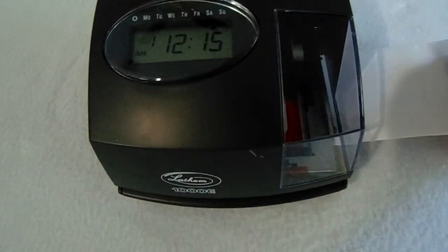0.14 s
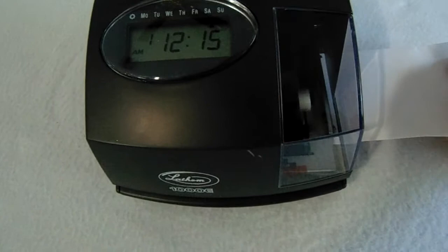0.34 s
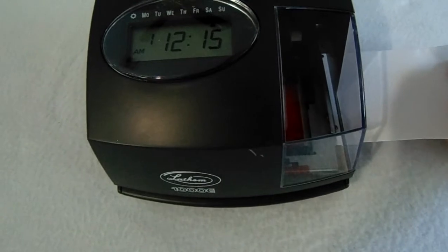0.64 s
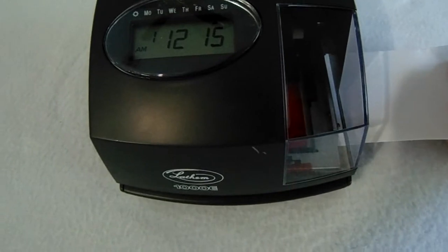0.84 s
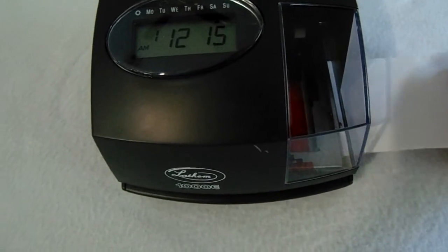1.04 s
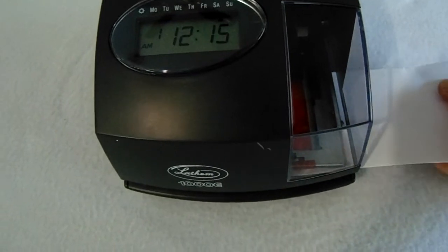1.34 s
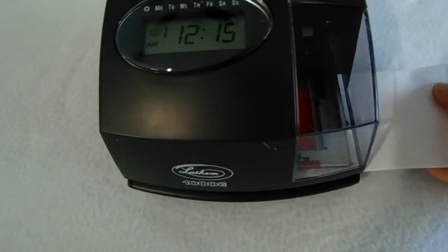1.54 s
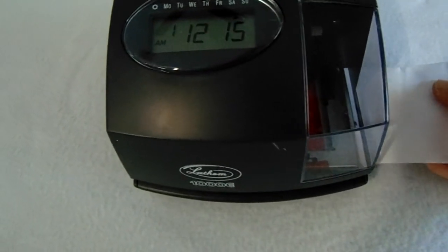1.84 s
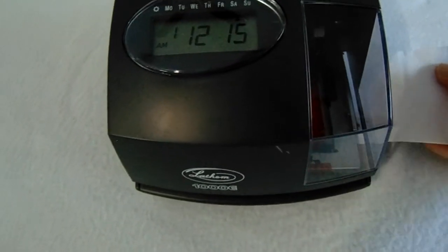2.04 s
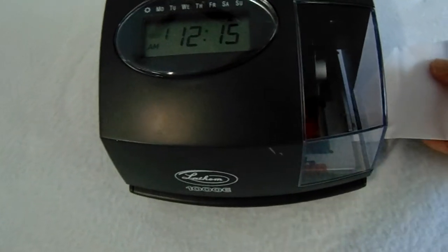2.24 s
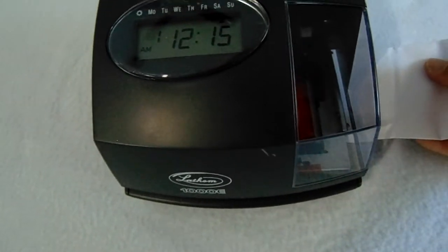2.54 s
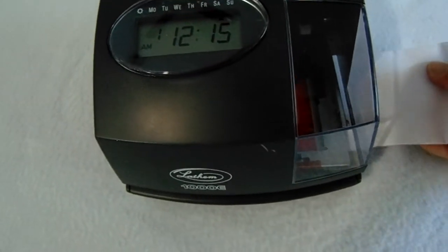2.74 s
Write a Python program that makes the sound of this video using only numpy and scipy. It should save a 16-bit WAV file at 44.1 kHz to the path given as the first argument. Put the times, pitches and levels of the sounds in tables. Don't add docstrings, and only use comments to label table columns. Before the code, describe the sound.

A desk time clock stamps a card twice with harsh motorized buzzing prints and sharp clacks

```python
import sys
import numpy as np
from scipy import signal
from scipy.fft import rfft, irfft, next_fast_len
from scipy.io import wavfile
from scipy.ndimage import uniform_filter1d, map_coordinates

SR = 44100
rng = np.random.default_rng(int(sys.argv[2]) if len(sys.argv) > 2 else 0)


def gain_from_db(level_db):
    decades = np.asarray(level_db, float) / 20
    return 10 ** decades


def dump(signal):
    limited = np.clip(np.atleast_2d(signal).T, -1, 1)
    pcm = np.round(limited * 32767).astype(np.int16)
    wavfile.write(sys.argv[1], SR, pcm)


N = 127890
TIME_S = np.arange(N) / SR
BEAT, BEAT_RATE_HZ, WANDER_HZ = 0.45, 62, 10
ROUGH_DB, ROUGH_RATE_HZ = 2.2, 180


def unit(x):
    return x / np.sqrt(np.mean(x ** 2) + 1e-20)


def along(points, hz):
    point_hz, value = np.transpose(points)
    return np.interp(np.log(hz + 1), np.log(point_hz + 1), value)


def curves(rows):
    s, *columns, level_db = np.transpose(rows)
    moving = [np.interp(TIME_S, s, column) for column in columns]
    return moving + [np.interp(TIME_S, s, level_db, -150, -150)]


def wobble(rate_hz):
    knots = rng.standard_normal(int(N * rate_hz / SR) + 4)
    return map_coordinates(knots, [np.arange(N) * rate_hz / SR])


def filtered(x, response):
    size = next_fast_len(N + SR // 2)
    return irfft(rfft(x, size) * response(np.fft.rfftfreq(size, 1 / SR)), size)[..., :N]


def noise(spectrum):
    return unit(filtered(rng.standard_normal(N), lambda hz: gain_from_db(along(spectrum, hz))))


def resonances(table):
    def response(f):
        total = 0
        for k, (hz, width, db) in enumerate(table):
            total = total + (-1) ** k * gain_from_db(db) * 1j * f * width / (hz * hz - f * f + 1j * f * width)
        return total
    return response


def phase(hz):
    return 2 * np.pi * np.cumsum(hz) / SR


def tone(hz, orders, beat):
    turn = phase(hz + WANDER_HZ * wobble(90))
    shaft = 2 * np.pi * BEAT_RATE_HZ * TIME_S
    out = 0
    for multiple, db in orders:
        swell = 1 + beat * np.sin(shaft + wobble(40) + 6 * rng.random())
        level = gain_from_db(db + ROUGH_DB * wobble(ROUGH_RATE_HZ))
        out = out + level * swell * np.sin(round(multiple) * turn + 6 * rng.random())
    return unit(out)


def effort(groups):
    power = 0
    for s, length, db in groups:
        after = np.clip(TIME_S - s - length, 0, None)
        rise = np.clip((TIME_S - s) / 0.00097, 0, 1) ** 2
        ring = gain_from_db(-120 * after / 0.045)
        rattle = gain_from_db(2 * -9 - 120 * after / 0.094)
        power = power + gain_from_db(2 * db) * rise * (ring + rattle)
    return np.sqrt(power)


# start_s, length_s, force_db
PRINT_GROUPS = [
    [(.284, 0.036, -16.5), (.327, 0.01, -20.5), (.343, 0.021, -19)],
    [(2.295, 0.043, -18), (2.343, 0.0046, -19.5), (2.356, 0.021, -20.5)],
]
# time_s, rate_hz, level_db
IN_STEP = [
    [(.284, 1089, -22.5), (.305, 1043, -28), (.325, 1007, -31), (.345, 1040, -34)],
    [(.312, 1135, -40), (.326, 1115, -28), (.337, 1092, -30), (.349, 1015, -28), (.368, 950, -33),
     (.38, 955, -46), (.39, 963, -38), (.418, 960, -40), (.428, 960, -55)],
    [(2.297, 1073, -37), (2.32, 1090, -26), (2.333, 1081, -21.5), (2.342, 1083, -26), (2.352, 1070, -35),
     (2.36, 1075, -18), (2.376, 1072, -25.5), (2.382, 1100, -39), (2.4, 1072, -55)],
]
# multiple of the rate, level_db
IN_STEP_ORDERS = [
    [(2, 8)],
    [(1, -9), (3, -1)],
    [(1, 1.5), (2, -4.5), (3, 4), (4, -8.5)],
]
# pitch_hz, width_hz, level_db
HEAD_RINGS = [(4620, 140, -7.5), (5700, 170, 3), (7360, 280, -4), (8780, 120, -6), (9170, 140, 2.5),
              (10300, 200, 3), (11130, 190, -7), (12740, 150, 1), (13000, 150, -0.5), (14000, 290, 5.5)]
# pitch_hz, level_db (per Hz)
PLATEN_COLOUR = [(120, -71), (200, -14), (737, -18), (1130, 1), (1380, -11.5), (2190, -10.5), (3300, -9.5),
                 (3950, -13.5), (14300, -10)]


def needles():
    column_hz, scatter_db, column_db, loose = 1070, 2.5, 1, 1.23
    head_db, platen_db, platen_lag_s = -3.5, -1.5, 0.0059
    shake_db, shake_hz = -39, 100
    push = sum(effort(groups) for groups in PRINT_GROUPS)
    fire = np.diff(np.floor(np.arange(N) * column_hz / SR), prepend=0)
    fire = unit(fire * gain_from_db(scatter_db * rng.standard_normal(N))) * np.sign(rng.standard_normal(N))
    blows = push * gain_from_db(column_db * wobble(200)) * unit(fire + loose * rng.standard_normal(N))

    ring, f = resonances(HEAD_RINGS), np.linspace(1, SR / 2, 2000)
    head = filtered(blows, ring) / np.sqrt(np.mean(abs(ring(f)) ** 2))
    late_push = uniform_filter1d(push, size=round(platen_lag_s * SR))
    late_push = np.roll(late_push, round(platen_lag_s * SR / 2))
    lag = np.minimum(1, late_push / (push + 1e-9))
    platen = filtered(lag * blows, lambda hz: gain_from_db(along(PLATEN_COLOUR, hz)))
    platen = platen / np.sqrt(np.mean(gain_from_db(2 * along(PLATEN_COLOUR, f))))

    in_step = 0
    for rows, orders in zip(IN_STEP, IN_STEP_ORDERS):
        rate_hz, level_db = curves(rows)
        in_step = in_step + gain_from_db(level_db) * tone(rate_hz, orders, BEAT)
    shake = uniform_filter1d(push, size=1500) * tone(shake_hz, [(1, 0)], BEAT / 2)
    return gain_from_db(head_db) * head + gain_from_db(platen_db) * platen + in_step + gain_from_db(shake_db) * shake


# time_s, pitch_hz (rate of meeting teeth), level_db
GEAR_WHINE = [
    [(.205, 1114, -67), (.24, 1191, -36), (.273, 1185, -32.5), (.34, 1170, -35.5), (.39, 1200, -48),
     (.468, 1150, -72), (.485, 1126, -35), (.53, 1190, -38.5), (.585, 1198, -35)],
    [(2.25, 1178, -39), (2.35, 1208, -32), (2.372, 1206, -38), (2.398, 1140, -31), (2.44, 1128, -36),
     (2.48, 1126, -71), (2.505, 1157, -33), (2.555, 1207, -42), (2.6, 1208, -36)],
]
# multiple of the pitch, level_db
WHINE_ORDERS = [(1, -5), (2, 3.5)]
# pitch_hz, level_db (per Hz)
GRIND_COLOUR = [(88, -23.5), (150, -27), (347, -6), (1030, -14), (1200, -1.5), (1320, -15.5), (2380, -11),
                (3420, -17.5), (14300, -33)]
# on_s, off_s, grind_db
MOTOR_RUNS = [
    (0.187, 0.6, -35),
    (2.217, 2.612, -35),
]
# start_s, length_s, pitch_hz, level_db
SQUEAK_BURSTS = [(.247, 0.012, 4720, -35), (0.267, 0.014, 4765, -26), (.4, .01, 4800, -43),
                 (.416, 0.0081, 4850, -42), (0.419, .045, 1001, -39), (0.452, 0.014, 3970, -41),
                 (.477, 0.014, 4790, -37), (0.496, 0.027, 4750, -37), (0.53, 0.055, 4730, -41),
                 (0.581, 0.017, 4760, -39), (2.23, .012, 2920, -44), (2.28, .014, 4870, -35),
                 (2.294, .01, 4150, -35), (2.306, 0.05, 4380, -35), (2.415, 0.034, 4530, -45),
                 (2.497, 0.024, 4700, -39), (0.283, 0.014, 11300, -26), (0.29, .026, 9160, -24),
                 (0.342, .03, 14000, -29), (.345, 0.02, 13000, -31), (2.296, 0.009, 9900, -22),
                 (2.295, 0.0082, 11050, -23), (2.301, .03, 5850, -31.5), (2.359, 0.027, 7060, -28)]


def motor():
    spin_up_s, coast_t60_s = 0.061, 0.2
    out = 0
    for rows, (on, off, grind_db) in zip(GEAR_WHINE, MOTOR_RUNS):
        hz, db = curves(rows)
        coast = gain_from_db(-60 * np.clip(TIME_S - off, 0, None) / coast_t60_s)
        run = np.clip((TIME_S - on) / spin_up_s, 0, 1) * coast
        out = out + gain_from_db(db) * tone(hz, WHINE_ORDERS, BEAT)
        out = out + gain_from_db(grind_db) * run * noise(GRIND_COLOUR)
    for s, length, hz, db in SQUEAK_BURSTS:
        turn = phase(hz + 3 * WANDER_HZ * wobble(90))
        swell = np.sqrt(abs(np.sin(np.pi * np.clip((TIME_S - s) / length, 0, 1))))
        swell = swell * (TIME_S < s + length)
        out = out + gain_from_db(db + 3 + ROUGH_DB * wobble(ROUGH_RATE_HZ)) * swell * np.sin(turn)
    return out


# time_s, thud_db, clack_db, snap_db
CONTACTS = [(.204, -34.5, -44, -70), (.236, -16.5, -16, -31), (.248, -47, -39, -40),
            (0.254, -20.5, -20, -60), (0.266, -16.5, -21.5, -28), (.472, -30.5, -22.5, -28.5),
            (.54, -56, -57, -32.5), (.583, -28, -21.5, -22), (.593, -25, -28.5, -34),
            (.621, -24.5, -28.5, -49), (2.216, -36.5, -45.5, -61), (2.248, -18.5, -16, -45),
            (2.259, -20, -27, -55), (2.267, -17.5, -22.5, -65), (2.279, -26, -29, -35),
            (2.458, -26.5, -26, -32), (2.489, -40, -25, -21.5), (2.53, -53, -29, -48),
            (2.599, -24.5, -22.5, -23), (2.612, -27.5, -30, -34), (2.638, -25, -25.5, -50),
            (0.651, -38.5, -50, -70), (.68, -45, -60, -75), (2.657, -44, -54, -67), (.092, -44, -46, -69),
            (1.152, -45.5, -69, -50.5), (2.12, -49, -41.5, -47), (2.145, -50, -45, -56)]
# pitch_hz, level_db (per Hz)
THUD_COLOUR = [(100, -54), (160, -15), (230, -10), (370, -1), (650, -1.5), (1100, -5.5), (1800, -55)]
CLACK_COLOUR = [(800, -18), (1200, 1.5), (2400, -1), (3400, -0.5), (4600, -5.5), (6500, -19)]
SNAP_COLOUR = [(4000, -13), (5500, 3.5), (7400, 6), (8500, -5), (12500, -4.5), (14300, 0.5)]
# seconds for thud, clack, snap
CONTACT_T60_S = [0.099, 0.088, 0.072]
# pitch_hz, width_hz, level_db
CASE_RINGS = [(153, 44, 1), (375, 29, 7), (556.6, 23, 1.5), (648.4, 13, 2.5), (1200, 15.6, 9)]


def knocks():
    body_db, crack_t60_s, rise_s, low_cut_hz = -4, 0.029, 0.00088, 100
    t, out = np.arange(SR // 4) / SR, 0
    colours = [THUD_COLOUR, CLACK_COLOUR, SNAP_COLOUR]
    for part, (colour, t60) in enumerate(zip(colours, CONTACT_T60_S)):
        fade = gain_from_db(2 * body_db - 120 * t / t60)
        if part > 0:
            fade = fade + gain_from_db(-120 * t / crack_t60_s)
        fade = fade * (1 - np.exp(-t / rise_s))
        power = np.zeros(N + SR)
        for row in CONTACTS:
            power[round(row[0] * SR):][:len(t)] += gain_from_db(2 * row[1 + part]) * fade
        out = out + np.sqrt(power[:N]) * noise(colour)
    ring = resonances(CASE_RINGS)
    return filtered(out, lambda f: (1 + ring(f + 1)) * (1j * f / (low_cut_hz + 1j * f)) ** 3)


# time_s, peak_db
FOCUS_STEPS = [(0.018, -40.5), (0.051, -41.5), (0.088, -43), (0.147, -38), (0.18, -39), (1.493, -42.5),
               (1.529, -44), (1.563, -45.5), (1.59, -46), (1.631, -44.5), (1.667, -45.5), (1.728, -37.5),
               (1.765, -39), (1.791, -39), (1.832, -38.5), (1.858, -37.5), (1.893, -40), (1.93, -38.5),
               (1.963, -39), (1.991, -39.5), (2.026, -41.5), (2.062, -38.5), (2.089, -44)]
# first_hz, last_hz, level_db, t60_s
LENS_RINGS = [(298, 380, -7.5, .03), (573, 820, 0.5, 0.078), (970, 1020, -2, 0.033), (1207, 1330, -6, .03)]


def focus():
    tick_db, step_s, rise_s = -7.5, 0.011, 0.00062
    spread_db, detune = 2, 0.02
    out, t = np.zeros(N + SR), np.arange(SR // 10) / SR
    closed = np.clip(t / step_s, 0, 1)
    for s, db in FOCUS_STEPS:
        ring = 0
        for first, last, level, t60 in LENS_RINGS:
            chance, turn = rng.standard_normal(2)
            fade_db = -60 * np.clip(t - step_s / 2, 0, None) / t60
            angle = phase(first + (last - first) * closed) * (1 + detune * chance)
            ring = ring + gain_from_db(level + spread_db * chance + fade_db) * np.sin(angle + turn)
        out[round(s * SR):][:len(t)] += gain_from_db(db + tick_db) * ring * (1 - np.exp(-t / rise_s))
    return out[:N]


# start_s, length_s, level_db, pitch_hz (centre of the hiss), width_hz
CARD_SLIDES = [(0, 0.11, -51.5, 5500, 9000), (0.95, 0.21, -56.5, 6200, 400),
               (0.996, 0.76, -61.5, 2700, 498), (1.01, 0.2, -58, 2720, 120), (1.177, 0.27, -51, 6900, 8840),
               (1.294, 0.46, -59, 10600, 3180), (1.895, 0.077, -56, 6960, 9000),
               (2.013, 0.16, -54, 5000, 9000), (2.686, 0.066, -51, 5500, 1500),
               (2.717, 0.1, -59, 5450, 295), (2.666, 0.26, -57, 8400, 6440)]


def card():
    out = 0
    for s, length, db, hz, width in CARD_SLIDES:
        swell = np.sin(np.pi * np.clip((TIME_S - s) / length, 0, 1)) ** 0.4
        rub = filtered(rng.standard_normal(N), lambda f: 1 / (1 + ((f - hz) / width) ** 2))
        out = out + gain_from_db(db + 0.66 * wobble(70)) * swell * unit(rub)
    return out


# pitch_hz, t60_s
ROOM_FADE = [(200, 0.49), (1200, 0.46), (4000, 0.23), (12000, 0.34)]


def room(x):
    hz, t, z = signal.stft(rng.standard_normal(SR // 2), SR, nperseg=256)
    fade = gain_from_db(-60 * t / along(ROOM_FADE, hz)[:, None])
    tail = signal.istft(z * fade, SR, nperseg=256)[1]
    delayed = np.pad(x, (300, 0))
    return signal.fftconvolve(delayed, tail / np.linalg.norm(tail))[:N]


# pitch_hz, level_db (per Hz)
AIR_COLOUR = [(15, -48), (25, -15.5), (239, -9), (296, -7), (338, -12.5), (429, -8), (545, -14),
              (856, -15.5), (14300, -29.5)]


def air():
    return gain_from_db(-52.5 + 0.33 * wobble(3.65)) * noise(AIR_COLOUR)


def scene():
    clock = needles() + motor() + knocks()
    echo = gain_from_db(-11.5) * room(clock)
    return (clock + echo + focus() + card() + air())[None]


def low_pass(x):
    return signal.sosfilt(signal.butter(12, 15000, fs=SR, output="sos"), x)


def record(dry):
    ceiling, knee = 0.75, 4
    top_hz, edge_hz = 14230, 120
    rounded = dry / (1 + abs(dry / ceiling) ** knee) ** (1 / knee)
    mix = filtered(rounded, lambda hz: np.clip((top_hz - hz) / edge_hz, 0, 1) ** 2)
    return low_pass(mix)


dry = scene()
out = record(dry)
dump(out)
```